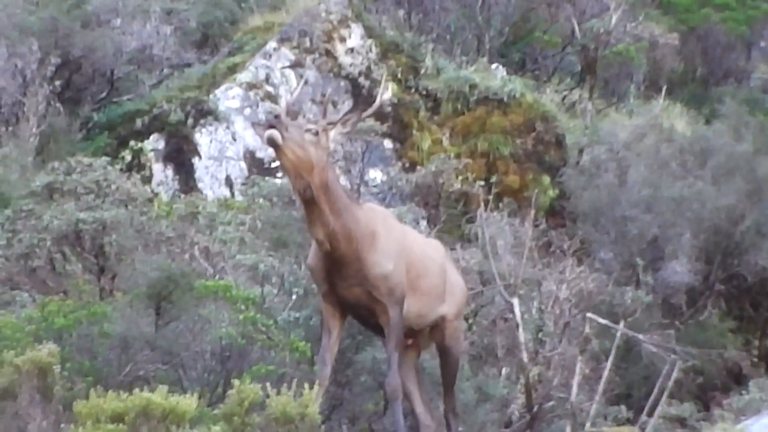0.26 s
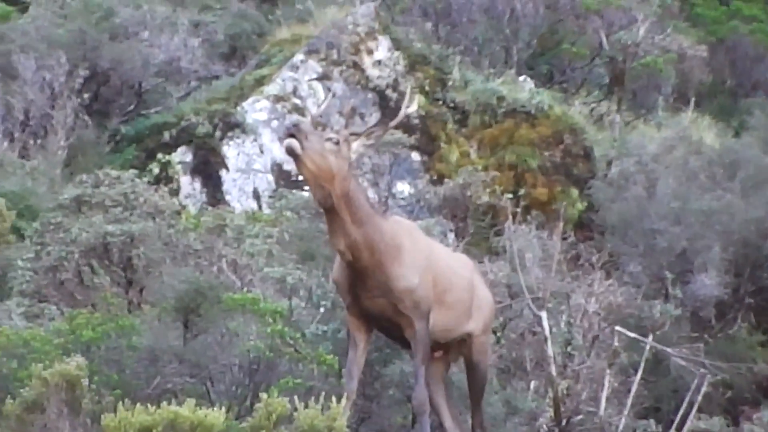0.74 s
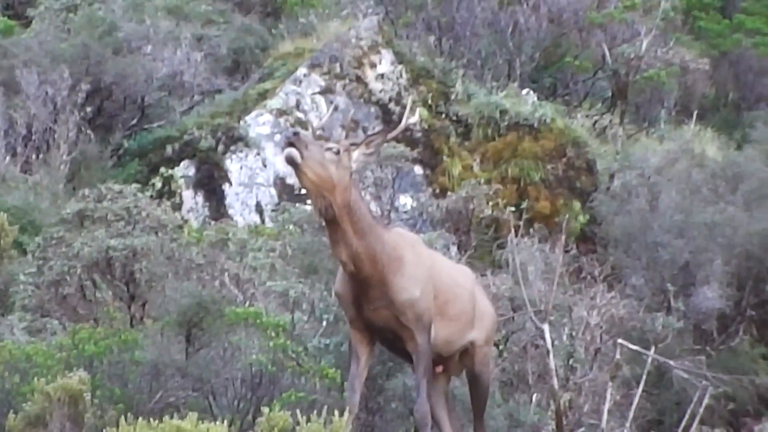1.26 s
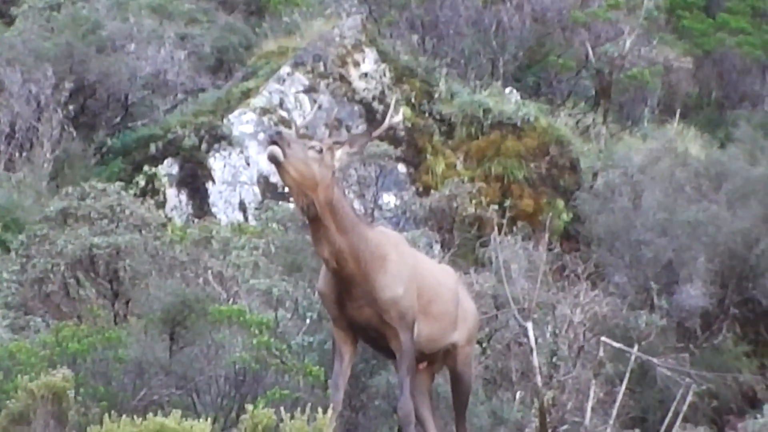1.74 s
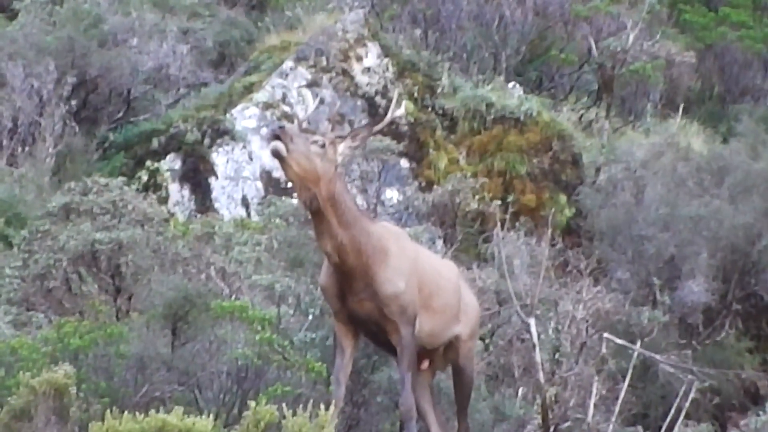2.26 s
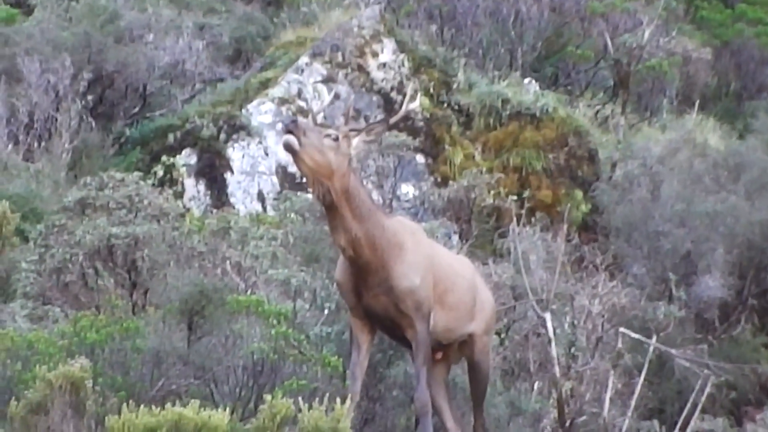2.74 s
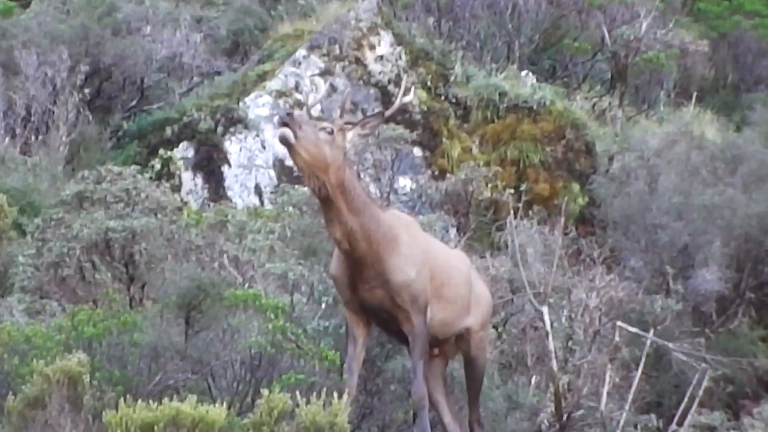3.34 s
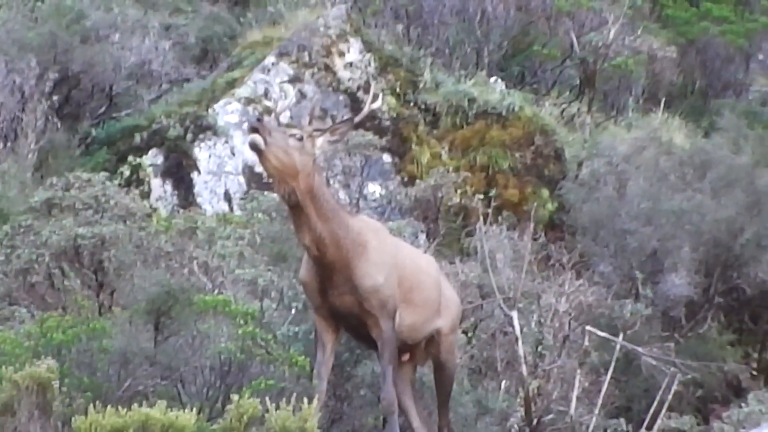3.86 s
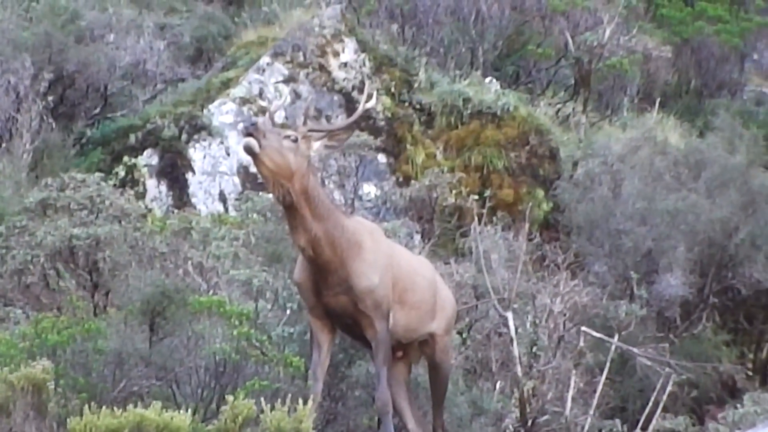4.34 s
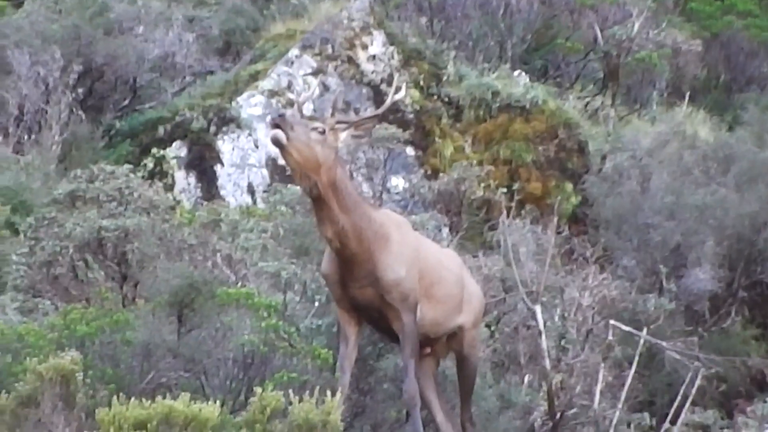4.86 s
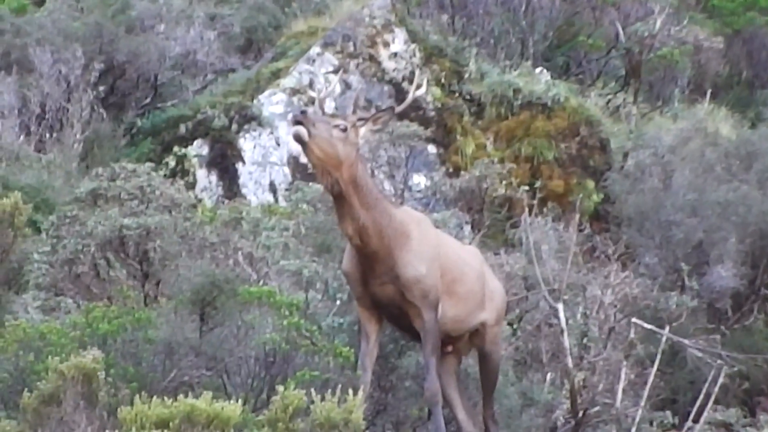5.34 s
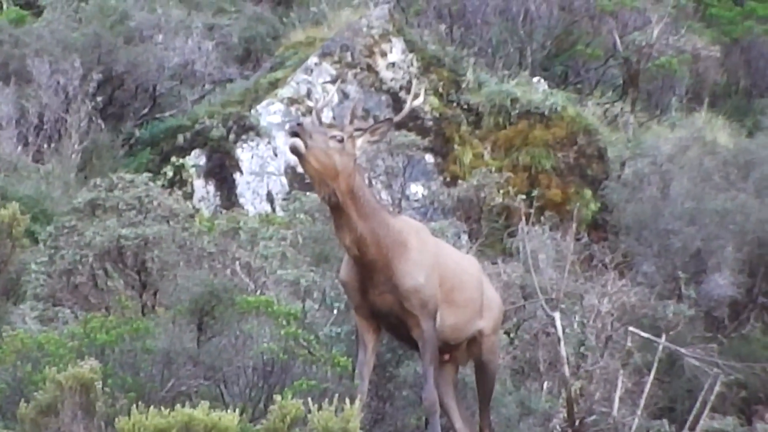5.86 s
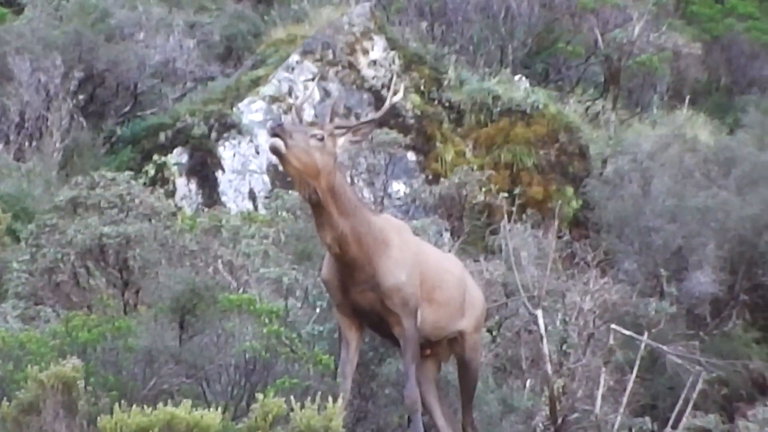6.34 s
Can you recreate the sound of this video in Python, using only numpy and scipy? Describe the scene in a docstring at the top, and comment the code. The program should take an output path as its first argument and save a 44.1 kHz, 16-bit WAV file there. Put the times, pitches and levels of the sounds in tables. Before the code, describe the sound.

Large male deer, outdoors in still air: low raspy grunts, each swelling and stopping abruptly, with soft hissing inhalations before them. Three roars of about half a second interrupt the series, louder and brighter, a nasal whistle locking in through the growl. One tiny dry tick early, faint wind bumps on the microphone, and a distant bird's drooping whistle near the end. Scrub and slope return only a slight echo.

```python
"""Faint outdoor air and a drawn breath come first, then a wapiti bull's hoarse grunts and three longer roars.
Irregular flaps of his vocal folds excite the resonances of a long throat (source and filter).
In the roars the mouth opens, adding resonances, and forced air locks into a whistle through the rasp.
Breaths are filtered turbulence, and the bushy slope answers with a thin tail and a low echo.
A dry tick, soft wind buffets and a far bird's drooping whistle are heard once or a few times."""
import sys
import numpy as np
from scipy import signal
from scipy.fft import rfft, irfft
from scipy.io import wavfile
from scipy.ndimage import uniform_filter1d

SR = 44100
rng = np.random.default_rng(int(sys.argv[2]) if len(sys.argv) > 2 else 0)


def to_wav(sig):
    """Store sig (one row per channel, or 1-D mono) as 16-bit WAV at the path in sys.argv[1].

    Samples outside -1..1 are clipped; the rate is SR.
    """
    pcm = np.clip(np.atleast_2d(sig), -1, 1) * 32767
    pcm = np.round(pcm).astype(np.int16)
    wavfile.write(sys.argv[1], SR, pcm.T)  # frames by channels


N = 291060  # 6.6 s


def gain_of(db):
    """Logarithmic level: decibels to amplitude."""
    return 10 ** (np.asarray(db) / 20)


def evened(x):
    """Normalization of mean power: scales to rms 1."""
    return x / np.sqrt(np.mean(x ** 2) + 1e-20)


def read(points, hz):
    """Spectral interpolation: reads a curve on a log-frequency axis."""
    f, value = np.transpose(points)
    return np.interp(np.log(hz + 1), np.log(f + 1), value)


def over_time(points):
    """Linear interpolation of (start_s, value) points, per sample."""
    return np.interp(np.arange(N) / SR, *np.transpose(points))


def add(mix, start_s, sound):
    """Superposition: mixes a sound in at start_s, or at zero if that is negative."""
    part = mix[max(round(start_s * SR), 0):][:len(sound)]
    part += sound[:len(part)]


def smooth(x, seconds):
    """Low-pass averaging: two running means make a triangular window."""
    size = max(int(seconds * SR), 1)
    return uniform_filter1d(uniform_filter1d(x, size), size)


def wander(seconds):
    """Random modulation: smoothed noise of rms 1."""
    return evened(smooth(rng.standard_normal(N), seconds))


def steadied(x, seconds):
    """Envelope division: holds the slow level at 1 and keeps the faster flutter."""
    return x / np.sqrt(abs(smooth(x * x, seconds)) + 1e-12)


def throat(x, modes):
    """Minimum-phase filtering: steep-sided resonances that respond only after excitation."""
    size = 8192
    hz = abs(np.fft.fftfreq(size, 1 / SR))
    power = sum(gain_of(db) ** 2 / (1 + ((hz - f) / width) ** 2) ** 4 for f, width, db in modes)
    log_gain = np.log(power + 1e-9) / 2
    # the Hilbert transform of the log gain gives the minimum phase
    spectrum = np.exp(np.conj(signal.hilbert(log_gain)))
    kernel = np.fft.ifft(spectrum).real[:size // 2]
    return signal.oaconvolve(x, kernel)[:N]


def resonate(x, hz, width_hz):
    """Single damped resonance: a one-pole low-pass shifted up to hz."""
    turn = np.exp(2j * np.pi * np.cumsum(hz * np.ones(len(x))) / SR)
    r = np.exp(-np.pi * width_hz / SR)
    return 2 * (turn * signal.lfilter([1 - r], [1, -r], x / turn + 1e-18)).real


# Spectrum of the outdoor air before its overall level is set: frequency_hz, density_db (relative, per Hz)
AIR_SPECTRUM = [(25, -9), (90, -7.5), (240, -6.5), (410, 2.5), (560, -4), (1100, -5.5), (1700, -11.5),
                (2300, -18.5), (3000, -28), (4500, -26.5), (7000, -31), (10000, -33), (15000, -35)]
# Left-right coherence of the air: frequency_hz, coherence (0 to 1)
AIR_COHERENCE = [(30, 0.27), (100, 0.42), (400, 0.79), (1500, 0.43), (3000, 0.12), (6000, 0.082),
                 (15000, .1)]
AIR_DB = -50


def air(patchy_db=4.0, left_db=-2.5):
    """Partial coherence: outdoor noise drifts in patches, its treble nearly independent left and right."""
    frames, hz = N // 256 + 5, np.fft.rfftfreq(1024, 1 / SR)
    a, b, c, d, patches = rng.standard_normal((5, len(hz), frames))
    patches = uniform_filter1d(patches, size=12, axis=0)
    patches = evened(uniform_filter1d(patches, size=14, axis=1))
    same = read(AIR_COHERENCE, hz)[:, None]
    left = a + 1j * b
    right = same * left + np.sqrt(1 - same ** 2) * (c + 1j * d)
    z = np.array([left * gain_of(left_db * same), right])
    z *= gain_of(read(AIR_SPECTRUM, hz)[:, None] + patchy_db * patches * np.sqrt(same))
    wash = signal.istft(z, nperseg=1024, noverlap=768)[1][:, :N]
    return gain_of(AIR_DB) * evened(wash)


# Short grunts: start_s, push_s, swell_s, chest_linger_s, chest_db, rasp_db, ring_db, inhale_db
# (levels in dB before the trims and modulation of each layer)
GRUNTS = [ (0.051, 0.036, 0.029, .015, -31, -32.5, -38, -61),
          (0.297, 0.053, 0.046, .016, -25.5, -28, -28.5, -55.5),
          (0.592, 0.094, 0.062, .016, -23.5, -27.5, -25.5, -53.5),
          (0.924, 0.12, .058, .005, -21, -27.5, -28, -48.5),
          (1.263, 0.076, 0.05, 0.0011, -23, -31, -29.5, -45.5),
          (1.582, 0.06, .036, .006, -27.5, -33, -41, -46),
          (1.893, 0.063, 0.028, 0.0031, -27.5, -31.5, -32.5, -46),
          (2.189, 0.083, 0.052, .013, -22.5, -30.5, -29.5, -47),
          (3.147, 0.061, 0.027, 0.0039, -27.5, -35.5, -38.5, -46),
          (3.476, .075, 0.031, 0.00099, -27, -32.5, -32.5, -48.5),
          (3.822, .092, 0.028, .007, -26.5, -33, -35, -51),
          (4.974, 0.077, 0.044, 0.0011, -27, -36.5, -35, -53),
          (5.396, .093, 0.058, .019, -29, -34.5, -34.5, -54.5),
          (5.782, .104, .040, .028, -27, -32, -35, -56), ]
# Long roars: the same columns, then mouth_opening_s
ROARS = [ (2.493, .407, 0.061, .010, -21, -27, -29, -50, 0.056),
         (4.154, .530, 0.082, .010, -21.5, -27.5, -27.5, -52, 0.12),
         (6.108, .550, 0.11, .001, -20, -27, -26.5, -61, .17), ]


def calls():
    """Breath pushes in order of time; infinite opening time keeps the mouth shut in a grunt."""
    return sorted([(*row, np.inf) for row in GRUNTS] + [tuple(row) for row in ROARS])


# Throat resonances while air is drawn in: frequency_hz, width_hz, level_db (relative)
INHALE_MODES = [(399.7, 62.4, -0.5), (600, 23, -19), (716.6, 32, -5), (1040, 29, -13), (1264, 22, -13),
                (1669, 86, -12), (1880, 260, -23.5), (3180, 670, -41)]


def inhales(length_s=0.17, lead_s=0.16, flutter_db=3.0):
    """Filtered turbulence: air hisses in through the throat ahead of each call, the first from time zero."""
    level = np.zeros(N)
    for start, *_, db, _ in calls():
        add(level, start - lead_s, gain_of(db) * signal.windows.tukey(int(length_s * SR), .8))
    hiss = steadied(throat(rng.standard_normal(N), INHALE_MODES), 0.017)
    return level * hiss * gain_of(flutter_db * wander(0.0066))


# every push starts abruptly, swells up from SWELL_DB below, holds, and runs out
ATTACK_S, SWELL_DB, RUN_OUT_S, CLOSE_S = 0.015, 10.5, .040, 0.016
# in a roar the mouth starts to open after this delay, shifting the level of chest, rasp and ring
OPEN_AFTER_S, OPEN_DB = .065, (-1, 5, 8.5)
# Decay of the voice after the push (the chest also lingers): chest, rasp, ring (dB per s)
RELEASE_DB_PER_S = (620, 848, 751)


def gestures(slack_over_s=.045):
    """Articulation: chest, rasp and ring amplitude, mouth opening, and slackening of the folds at the end."""
    tracks = np.zeros((5, N))
    for start, push, swell, linger, *levels, _, opening in calls():
        t = np.arange(0, push + linger + RUN_OUT_S, 1 / SR)
        left_s = t[-1] - t
        edges = np.clip(np.minimum(t / ATTACK_S, left_s / CLOSE_S), 0, 1)
        swell_db = SWELL_DB * np.minimum(t / swell - 1, 0)
        gape = np.clip((t - OPEN_AFTER_S) / opening, 0, 1)
        slack = np.clip(1 - left_s / slack_over_s, 0, 1)
        curves = []
        ends = (push + linger, push, push)
        for db, open_db, release, end in zip(levels, OPEN_DB, RELEASE_DB_PER_S, ends):
            level_db = db + swell_db + open_db * gape - release * np.maximum(t - end, 0)
            curves.append(edges * gain_of(level_db))
        for track, curve in zip(tracks, curves + [gape * (1 - slack), slack]):
            add(track, start, curve)
    return tracks


def folds(gape, slack, grunt_hz=150, roar_hz=175, sag=.45, jitter=.3, shimmer_db=3, rough=0.58,
          puff_depth=0.6):
    """Irregular self-oscillation: the folds flap with jitter and let through puffs of turbulent air."""
    hz = (grunt_hz + (roar_hz - grunt_hz) * gape) * (1 - sag * slack)
    turns = np.cumsum(hz * np.exp(jitter * (1 - slack) * wander(.003))) / SR
    flaps = np.diff(np.floor(turns), prepend=0)  # one pulse a cycle
    puffs = np.exp(puff_depth * np.cos(2 * np.pi * turns)) * rng.standard_normal(N)
    source = np.sqrt(1 - rough) * evened(flaps) + np.sqrt(rough) * (1 - slack) * evened(puffs)
    return source * gain_of(shimmer_db * wander(0.0082))


# Voice cracks: center_s, rasp_rise_db
CRACKS = [(5.849, 10), (5.884, 8)]


def cracks(length_s=0.015):
    """Brief amplitude modulation: the rasp's gain is 1 except where the voice cracks harsher."""
    rise_db = np.zeros(N)
    for center, db in CRACKS:
        add(rise_db, center - length_s / 2, db * np.hanning(int(length_s * SR)))
    return gain_of(rise_db)


# One table a roar, the whistle's contour before its trim: time_s, pitch_hz, level_db
WHISTLE_CONTOURS = [
    [(2.57, 681, -35), (2.584, 709, -27.5), (2.602, 687, -22), (2.656, 725.8, -18), (2.728, 733.4, -20),
     (2.828, 716.2, -24), (2.85, 746, -21), (2.886, 716.4, -20), (2.92, 713, -34.5)],
    [(4.27, 693.2, -24.5), (4.308, 650.4, -32), (4.332, 644.8, -21.5), (4.354, 712.6, -18.5),
     (4.442, 734.7, -19), (4.488, 736.6, -27), (4.52, 719.5, -23.5), (4.684, 719.3, -23.5),
     (4.7, 740.0, -32)],
    [(6.2, 669, -30), (6.222, 701.3, -15.5), (6.328, 719.3, -20.5), (6.418, 720, -14.5),
     (6.442, 683, -31.5), (6.464, 713, -24.5), (6.514, 711, -28), (6.53, 717, -21.5), (6.59, 709, -15)],
]


def whistling():
    """Pitch contour: the whistle's frequency and level per sample."""
    s, *columns = np.concatenate(WHISTLE_CONTOURS).T
    return [np.interp(np.arange(N) / SR, s, column) for column in columns]


# Harmonics of the whistle: multiple (of its pitch), level_db (relative)
OVERTONES = [(1, -1), (2, -19.5), (3, -32.5), (4, -47.5), (5, -58)]


def whistle(hz, level_db, waver_hz=10, flutter_db=2.0):
    """Aeroacoustic locking: forced air sounds a wavering tone with weak harmonics."""
    turns = np.cumsum(hz + waver_hz * wander(0.0032)) / SR
    tone = sum(gain_of(db) * np.sin(2 * np.pi * (round(k) * turns + rng.random())) for k, db in OVERTONES)
    return gain_of(level_db) * evened(tone * gain_of(flutter_db * wander(0.0073)))


# Throat resonances in the tables below: frequency_hz, width_hz, level_db (relative within each table)
# low resonances, mouth closed and mouth wide open
CHEST_MODES = [(325, 34, -12.5), (410.2, 54, 4), (473, 122, -6.5), (616.7, 59, -7.5), (686, 90, -9.5),
               (812, 151, -18)]
CHEST_OPEN_MODES = [(415.5, 49, 2), (493, 145, -10.5), (620, 63, -6), (730, 76, -7), (770, 151, -17)]
# upper resonances
RASP_MODES = [(1015.6, 53, 0.5), (1141, 134.6, -2.5), (1236, 120, -5.5), (1666, 86, 3), (1775, 100, 1.5),
              (1874, 24, -2), (2310, 65, -23.5), (3080, 330, -42), (3755, 250, -41), (6500, 4400, -58)]
# resonances added by the wide open mouth
GAPE_MODES = [(842, 72.5, 4), (1162, 148, 9.5), (1450, 31, -14.5), (2315, 81, -7.5), (2990, 290, -35.5),
              (3140, 120, -39), (4770, 280, -53.5), (5840, 160, -44.5), (6280, 140, -39), (7150, 250, -46),
              (8500, 1800, -63.5)]
# deep hum of the neck
NECK_MODES = [(132.9, 18, -2.5), (205.2, 45, 2.5)]
# nasal resonances
NASAL_MODES = [(2174, 108, -6.5), (2324, 77, 2.5), (4920, 100, -23.5)]
# thin wheeze
WHEEZE_MODES = [(2930, 60, -8), (2900, 63, 0.5), (3310, 71, -0.5), (3570, 80, -1.5), (3760, 100, -7.5),
                (5800, 370, -15)]
# Level of the nasal sound and of the wheeze: time_s, level_db (re the rasp)
NASAL_LEVELS = [(.1, -31), (.7, -23.5), (2.5, -23), (4.25, -26), (4.5, -34), (5.4, -58)]
WHEEZE_LEVELS = [(.1, -48), (1.0, -38.5), (2.7, -42.5), (3.2, -49), (3.8, -32), (4.2, -56), (5.1, -62),
                 (5.42, -29.5), (5.85, -34.5), (6.25, -36), (6.6, -38.5)]
RING_HZ, RING_WIDTH_HZ = 724, 42
# whistle and chest share the air: each dB of whistle above usual takes this many dB from the chest
USUAL_WHISTLE_DB, WHISTLE_TAKES = -25, 0.44


def bull(chest_db=-1.53, rasp_db=-1.15, gape_db=-7, ring_db=-4, whistle_db=-1, neck_db=-29,
         neck_open_db=-4, neck_follow=0.7, flutter_db=3.5, throb_db=2.0):
    """Source and filter: flaps sound the throat; an open mouth cuts the hum and turns ring to whistle."""
    chest, rasp, ring, gape, slack = gestures()
    tone_hz, tone_db = whistling()
    taken_db = WHISTLE_TAKES * np.maximum(tone_db - USUAL_WHISTLE_DB, 0)
    chest = chest * gain_of(gape * (throb_db * wander(0.025) - taken_db))
    rasp = rasp * cracks()
    drive = folds(gape, slack)
    harsh_drive = drive * gain_of(flutter_db * wander(0.02))

    hum = chest ** neck_follow * steadied(throat(drive, NECK_MODES), 0.029)
    chest_note = (1 - gape) * throat(drive, CHEST_MODES) + gape * throat(drive, CHEST_OPEN_MODES)
    chest_note = chest * steadied(chest_note, 0.017)
    harsh = rasp * steadied(throat(harsh_drive, RASP_MODES), 0.017)
    open_mouth = rasp * gape * steadied(throat(drive, GAPE_MODES), 0.01)
    nasal = rasp * evened(throat(drive, NASAL_MODES))
    wheeze = rasp * evened(throat(rng.standard_normal(N), WHEEZE_MODES))
    ringing = resonate(resonate(drive, RING_HZ, RING_WIDTH_HZ), RING_HZ, RING_WIDTH_HZ)
    ringing = ring * np.sqrt(1 - gape) * steadied(ringing, 0.013)
    return (gain_of(neck_db + neck_open_db * gape) * hum
            + gain_of(chest_db) * chest_note
            + gain_of(rasp_db) * harsh
            + gain_of(gape_db) * open_mouth
            + gain_of(over_time(NASAL_LEVELS)) * nasal
            + gain_of(over_time(WHEEZE_LEVELS)) * wheeze
            + gain_of(ring_db) * ringing
            + gain_of(whistle_db) * gape * whistle(tone_hz, tone_db))


def slack_folds(level_db=-48, from_hz=135, to_hz=68, length_s=0.076, lead_s=0.016):
    """Falling tension lowers pitch: each call runs out in a few soft cycles of the bare fundamental."""
    out, size = np.zeros(N), int(length_s * SR)
    for start, push, *_ in calls():
        turns = np.cumsum(np.geomspace(from_hz, to_hz, size)) / SR + rng.random()
        add(out, start + push - lead_s, np.hanning(size) * np.sin(2 * np.pi * turns))
    return gain_of(level_db) * out


# Decay time of the scattered tail, held to at least 0.05 s: frequency_hz, t60_s
HILL_T60 = [(170, 2.5), (350, -0.48), (520, 0.43), (720, 1.11), (1700, 0.14), (4000, 1.32)]
# Colour of the scattered tail: frequency_hz, level_db (relative)
HILL_COLOUR = [(100, -8.5), (220, 8), (420, -3.5), (750, 1), (1700, 3.5), (5000, -7.5)]


def hillside(x, wet_db=-19, first_s=0.045, echo_s=0.085, echo_db=-8, echo_hz=260):
    """Scattering and reflection: scrub gives a thin tail, the slope one echo of the bass alone."""
    step = 20  # samples a scattered arrival
    at = np.arange(0, SR - step, step)
    taps = np.zeros(SR)
    taps[at + rng.integers(0, step, len(at))] = rng.choice([-1., 1.], len(at))
    hz, t, z = signal.stft(taps, SR, nperseg=256)
    t60 = np.maximum(read(HILL_T60, hz), .05)[:, None]
    tail = signal.istft(z * gain_of(-60 * t / t60), SR, nperseg=256)[1]
    colour = gain_of(read(HILL_COLOUR, np.fft.rfftfreq(len(tail), 1 / SR)))
    tail = irfft(rfft(tail / np.linalg.norm(tail)) * colour)
    tail = tail[:len(tail) * 9 // 10]
    bass = signal.sosfilt(signal.butter(4, echo_hz, fs=SR, output="sos"), x)
    out = np.zeros(N)
    add(out, first_s, gain_of(wet_db) * signal.fftconvolve(x, tail))
    add(out, echo_s, gain_of(echo_db) * bass)
    return out


def tick(start_s=.203, hz=1300, level_db=-27, decay_s=0.0008):
    """Damped oscillation: one small dry tick."""
    out, t = np.zeros(N), np.arange(SR // 20) / SR
    envelope = (t / decay_s) * np.exp(-t / decay_s)
    add(out, start_s, gain_of(level_db) * envelope * np.sin(2 * np.pi * hz * t))
    return out


# Light wind bumps on the microphone: start_s, decay_s, level_db (before the left and right offsets)
WIND_BUMPS = [(2.31, 0.1, -52), (3.55, .3, -62), (4.03, .04, -63)]


def wind(top_hz=55):
    """Turbulent pressure: soft decaying buffets of low-passed noise, stronger on the right."""
    level, t = np.zeros(N), np.arange(SR) / SR
    for start, decay, db in WIND_BUMPS:
        add(level, start, gain_of(db) * np.exp(-t / decay) * np.minimum(t / .01, 1))
    low_pass = signal.butter(2, top_hz, fs=SR, output="sos")
    rumble = signal.sosfilt(low_pass, rng.standard_normal((2, N)))
    return level * evened(rumble) * gain_of([[-8], [3]])  # left, right offset in dB


def bird(start_s=5.91, length_s=.125, top_hz=2620, fall_hz=210, waver_hz=35, level_db=-66):
    """Frequency modulation: a far bird's single drooping whistle."""
    out, u = np.zeros(N), np.linspace(0, 1, int(length_s * SR))
    turns = np.cumsum(top_hz - fall_hz * u ** 2 + waver_hz * wander(.002)[:len(u)]) / SR
    add(out, start_s, gain_of(level_db) * np.sin(np.pi * u) * np.sin(2 * np.pi * turns))
    return out


# Level difference between the channels: frequency_hz, left_minus_right_db
PLACE = [(100, -3.5), (700, -2.5), (1000, -2), (1550, -1), (1800, -4), (2100, -1.8), (5000, 2)]
# Phase by which the left leads: frequency_hz, lead_rad
LEFT_LEAD = [(0, 0), (1640, 0.16), (1980, 0.44), (2240, 0.053), (2760, 0.097)]


def scene():
    """Stereo localization: level and phase differences place the voice, echoes, tick and bird."""
    voice = bull() + slack_folds() + inhales()
    heard = rfft(voice + hillside(voice) + tick() + bird(), 2 * N)
    hz = np.fft.rfftfreq(2 * N, 1 / SR)
    lean_db = read(PLACE, hz)
    left = gain_of(lean_db / 2) * np.exp(1j * read(LEFT_LEAD, hz))
    right = gain_of(-lean_db / 2)
    return irfft(heard * np.array([left, right]))[:, :N] + air() + wind()


def record(dry, edge_hz=15780):
    """Band limitation: a steep low-pass follows a 2 ms fade at the end."""
    fade = np.minimum(np.arange(N)[::-1] / (.002 * SR), 1)
    low_pass = signal.firwin(511, edge_hz, window=("kaiser", 9), fs=SR)
    return signal.oaconvolve(dry * fade, low_pass[None], "same")


dry = scene()
out = record(dry)
to_wav(out)
```